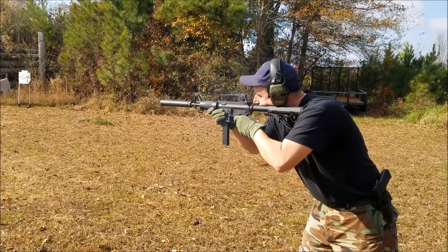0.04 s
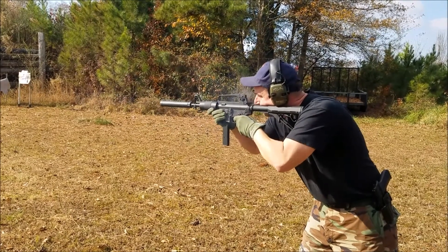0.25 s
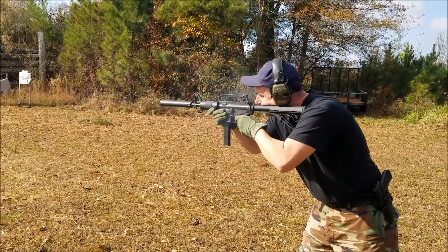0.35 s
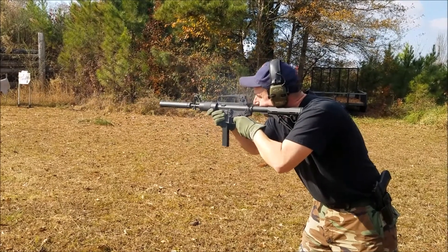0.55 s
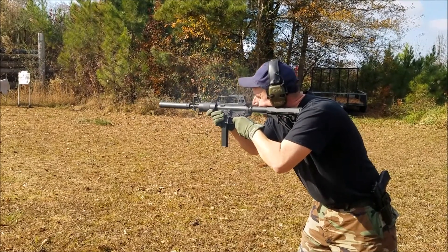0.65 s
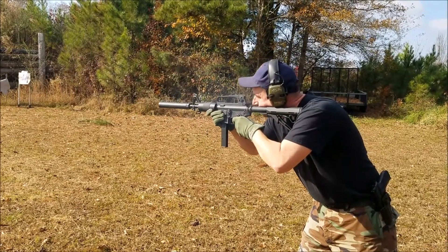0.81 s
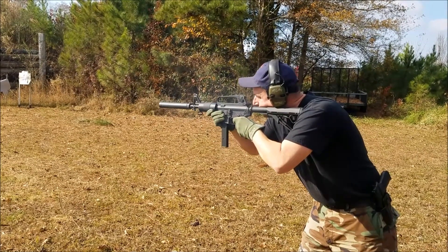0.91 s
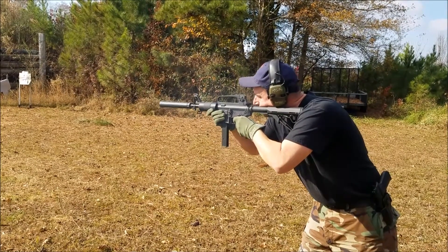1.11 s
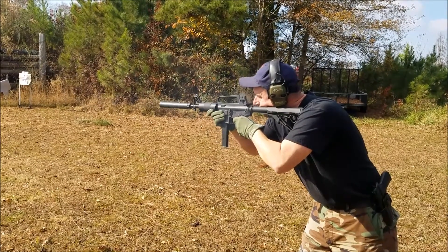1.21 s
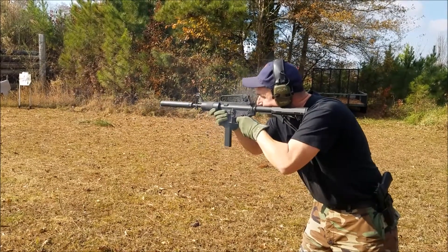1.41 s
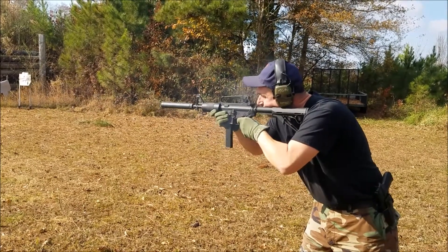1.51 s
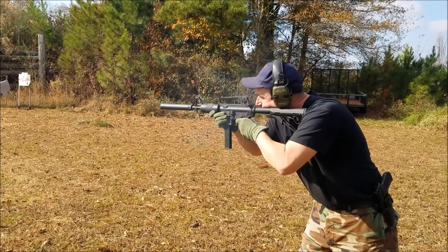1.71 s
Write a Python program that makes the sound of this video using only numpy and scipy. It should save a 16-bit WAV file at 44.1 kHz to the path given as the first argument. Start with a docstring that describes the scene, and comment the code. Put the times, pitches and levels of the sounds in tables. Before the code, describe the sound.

Muffled automatic gunfire in two short bursts, with clattering bolt and bullets clanging on a steel target

```python
"""First a steel plate hums over faint open-range air, an engine drone and a thin whine: drifting sines and noise.
Then a suppressed rifle fires two rounds and, a second later, three. Each is a dull pop of shaped noise with a
short ring from the can, and the bolt clatters as brief noise knocks. About a tenth of a second after the shots
begin, hits on the hanging plate splash, thud and ring as fading sines. Trees return a short tail of noisy echoes."""
import sys
import numpy as np
from scipy import signal
from scipy.fft import rfft, irfft
from scipy.io import wavfile
from scipy.ndimage import uniform_filter1d

SR = 44100
rng = np.random.default_rng(int(sys.argv[2]) if len(sys.argv) > 2 else 0)


def wav_out(sig):
    """Save sig, one row per channel (or a flat mono array), as 16-bit PCM at SR to the path in sys.argv[1]."""
    wavfile.write(sys.argv[1], SR, np.round(np.clip(np.atleast_2d(sig).T, -1, 1) * 32767).astype(np.int16))


N = 77175  # 1.75 seconds

# lowest hum of the swinging plate: [t/s, f/Hz, level/dB, how far the left lags/radians]
HUM = [(0, 1494, -31.5, 3.04), (.1, 1490, -22.5, 2.33), (.16, 1487, -26, 2.76), (.21, 1513, -27.5, 2.04),
       (.31, 1522, -51, 2.1), (.36, 1485, -15.5, 2.38), (.45, 1483, -26, 1.9), (.5, 1485.5, -23, 2.54),
       (.55, 1485.5, -32, 0.92), (.572, 1484, -38, 2.3), (.6, 1483, -24.5, 2.66), (.67, 1488, -17.5, 2.56),
       (.735, 1480, -24.5, 2.97), (.79, 1490, -19.5, 2.4), (.9, 1487, -21.5, 2.45),
       (1.04, 1494, -25.5, 2.52), (1.13, 1488, -17.5, 2.34), (1.2, 1498, -20.5, 2.51),
       (1.29, 1457, -38, 0.8), (1.34, 1495, -62, 2.4), (1.5, 1489, -76, 2.4), (1.62, 1488, -55, 1.84),
       (1.75, 1437, -54, 2.4)]
# colour of the air and leaves: [f/Hz, level per Hz/dB]
AIR_SPECTRUM = [(30, -17.5), (95, -12), (190, -10.5), (450, -1), (900, -8.5), (1800, -12), (3000, -14),
                (6000, -24.5), (9400, -35), (12000, -26), (14800, -21), (16500, -47)]
# background over time, before the layers are weighted: [t/s, air level/dB, drone level/dB]
BACKGROUND_LEVEL = [(0, -62.5, -58), (.19, -63.5, -48.5), (.24, -46.5, -54), (.45, -58.5, -59.5),
                    (.75, -64, -64), (1.03, -67, -66), (1.1, -64, -59), (1.23, -62, -52.5), (1.3, -50, -49),
                    (1.5, -57, -62.5), (1.75, -65, -70.5)]
# tones of the engine drone, relative to its level: [f/Hz, level/dB]
DRONE = [(94.5, -3), (285, -3.5), (475, -2)]
# thin high whine: [t/s, level/dB]
WHINE = [(0, -78), (.5, -59), (.66, -53.5), (.8, -67), (1.2, -68), (1.75, -89)]
# rounds fired: [t/s, gas level/dB, thump level before halving/dB, pop length/s]
ROUNDS = [(.2048, -4.5, -15, .012), (0.2705, -10, -17, 0.013), (1.2396, -4.5, -12.5, 0.013),
          (1.3045, -9, -19, 0.0094), (1.3723, -12.5, -21, 0.0084)]
# colour of the gas pop: [f/Hz, level per Hz/dB]
GAS_SPECTRUM = [(24, -50), (40, -32.5), (406, -5), (1170, -4), (2370, -7), (3050, -8), (3920, -15),
                (5440, -10), (8560, -28), (9240, -22.5), (11000, -13.5), (14900, -11), (16500, -41.5)]
# ringing of the suppressor can, relative to the thump: [f/Hz, level/dB, time to fade 60 dB/s]
CAN_MODES = [(315, -9.5, 0.066), (443, 12, 0.018), (950, -9.5, 0.006), (1269, 3, 0.03), (1290, 5.5, 0.054),
             (1860, -9, 0.012)]
# when the three puffs of gas leave the can, after the shot: [t/s]
CAN_PUFFS = [0, .0025, 0.007064]
# trigger, hammer, bolt and sling knocks, and one late bullet hit: [t/s, level/dB, decay/s, brightness/dB per
# octave]
KNOCKS = [(0.166, -51, 0.0077, 4.5), (.755, -59.5, 0.045, -2), (0.986, -47, 0.012, 6),
          (1.204, -43.5, .006, 4.5), (1.4866, -20.5, 0.0051, -3), (0.1951, -22.5, 0.0058, -2.5),
          (0.2215, -11, 0.0042, 1), (0.243, -21, 0.0027, -3), (.2604, -4, 0.002, 2.5),
          (0.288, -15.5, 0.015, 0.5), (.3100, -23, 0.023, .3), (.3255, -9, 0.0081, 9.5),
          (1.2304, -18, 0.004, -3), (1.2590, -16.5, 0.0032, -2), (1.2790, -35, .004, 11),
          (1.296, -6, 0.0013, 2), (1.323, -12, 0.0043, 8), (1.4253, -5.5, 0.001, -1.6),
          (1.64, -60, .002, -35)]
# colour of the rifle's action, before any tilt: [f/Hz, level per Hz/dB]
ACTION_SPECTRUM = [(60, -43), (250, -7.5), (1000, -6.5), (2100, 0), (4200, -4.5), (6500, -6), (9300, -15.5),
                   (11500, -8.5), (14500, -4.5), (16500, -33.5)]
# bands of the tree echo, relative to each other: [f/Hz, time to fade 60 dB/s, level/dB]
TREE_BANDS = [(100, .35, -3.5), (370, 0.72, -8), (1543, 0.49, 2.5), (4040, 0.59, 0.5), (8460, 0.52, 0),
              (15000, 0.38, 3)]
# strikes on the plate: [t/s, splash level/dB, splash decay/s, share of full ring length,
# then one ring level/dB for each frequency in STRIKE_HZ]
STRIKES = [(.3190, -11.5, 0.028, 0.86, -29.5, -20, -48, -23.5, -17.5, -16.5, -30.5, -12.5, -32.5, -40.5),
           (0.384, -6, 0.0054, 0.67, -38, -37.5, -25, -37, -20.5, -17, -29.5, -39.5, -29, -28.5),
           (1.3547, -12, 0.024, 0.67, -50, -21.5, -41.5, -38, -34, -25.5, -29, -21, -17, -19),
           (1.382, -23.5, 0.019, 0.27, -49, -49, -35, -23, -16, -38, -40, -10, -44, -42),
           (1.4260, -18, 0.011, .5, -35, -33, -48.5, -36, -65, -54, -58, -42, -40, -38)]
# frequencies at which each strike's ring level is given: [f/Hz]
STRIKE_HZ = [2069, 2484, 3225, 3927, 4901, 5790, 7600, 8036, 11200, 13400]
# pitches of the plate's modes: [f/Hz]
PLATE_HZ = [2069, 2484, 3225, 3927, 4901, 5767, 5815, 7517, 7742, 8036, 8305, 11057, 11490, 12570, 13360,
            14390]
# the same modes, added to or shortened by each strike: [level/dB, full time to fade 60 dB/s, swell/s]
PLATE_MODES = [(9, 0.26, 0.0038), (-2.5, 0.27, 0.012), (4, 0.29, 0.014), (-4.5, 0.36, .008),
               (4, .34, 0.013), (-3.3, .33, 0.017), (-2.5, 0.21, 0.004), (-2, 0.21, 0.0031),
               (-7.5, 0.332, 0.0092), (-1.6, .17, 0.0067), (-9, 0.24, 0.005), (-7, 0.29, .006),
               (4.5, 0.11, .004), (-13.5, 0.39, .006), (-5.5, .28, .01), (-9, .2, 0.0026)]
# dull thuds from the target bank: [t/s, level/dB, f/Hz, time to fade 60 dB/s]
THUDS = [(0.326, -20, 280, 0.028), (0.384, -22.5, 103.6, 0.039), (1.354, -15.5, 390, 0.02),
         (1.4915, -20, 262, 0.026)]

HUM_PAN_DB = -3  # left against right
AIR_FLICKER_DB, DRONE_WAVER_DB, WHINE_WAVER_DB, WHINE_HZ = 2, 3, 4.9, 11860
RIFLE_LEFT_LAG_S, RIFLE_PAN_DB = -0.000273, 4  # a negative lag reaches the left first
RIFLE_WIDE = 0.86  # share of noise power that each microphone has to itself
LEAD_IN_S = .002  # silence ahead of each burst
GAS_RISE_S, GAS_GRAIN_DB = 0.00092, 6
GAS_TAIL_DB, GAS_TAIL_S = -7.5, .022  # hiss against pop
KNOCK_RISE = .4  # part of the decay time
TREES_DB, TREES_RISE_S = -14.5, 0.028
PLATE_LEFT_LAG_S, PLATE_PAN_DB = 0.000284, 3.5
PLATE_WOBBLE_DB, PLATE_ROUGH_DB = 1.5, 2.5  # slow waver; fast waver at 12 kHz
PLATE_TURN = 1.5  # above 1, the fade speeds up
PLATE_AFTER_DB, PLATE_AFTER_S = -37, 4  # faint late ring; its 60 dB fade at 4 kHz for a full-length ring
PLATE_ECHO = 0.11  # gain of the ring into the trees
MIC_LOW_HZ, TOP_HZ, CLIP_DRIVE = 135, 16200, 1.27


def undb(db):
    """Turn decibels into gain."""
    return 10 ** (np.asarray(db, float) / 20)


def clock():
    """Time in seconds for every sample."""
    return np.arange(N) / SR


def curve(table, axis=1):
    """Join one column of a table over time, with rounded corners."""
    table = np.array(table, float)
    return uniform_filter1d(np.interp(clock(), table[:, 0], table[:, axis]), size=400)


def noise(table, size, tilt_db=0.):
    """Noise of rms 1, coloured by [f/Hz, level/dB] points and a tilt in dB per octave."""
    table = np.array(table, float)
    f = np.maximum(np.fft.rfftfreq(size, 1 / SR), 10)
    db = np.interp(np.log(f), np.log(table[:, 0]), table[:, 1]) + tilt_db * np.log2(f / 3000)
    x = irfft(rfft(rng.standard_normal(size)) * undb(db), size)
    return x / x.std()


def walk(rate, size):
    """Random levels, rate of them a second, joined by straight lines."""
    steps = rng.standard_normal(int(size / SR * rate) + 2)
    return np.interp(np.arange(size) / SR * rate, np.arange(len(steps)), steps)


def add(out, x, at):
    """Mix x into out, starting at a time in seconds."""
    i = int(at * SR)
    x = x[..., :N - i]
    out[..., i:i + x.shape[-1]] += x


def place(x, lag, pan_db):
    """Set a sound between two microphones: the left hears it lag seconds late and pan_db louder."""
    f = np.fft.rfftfreq(len(x), 1 / SR)
    left = irfft(rfft(x) * np.exp(-2j * np.pi * f * lag), len(x))
    return np.array([left, x]) * undb([[pan_db / 2], [-pan_db / 2]])


def burst(table, shape, tilt_db=0., grain_db=0.):
    """Grainy shaped noise, partly shared by both microphones and partly their own."""
    grainy = shape * undb(grain_db * walk(1000, size=len(shape)))
    shared, left, right = (noise(table, len(shape), tilt_db) * grainy for _ in range(3))
    x = np.sqrt(1 - RIFLE_WIDE) * place(shared, RIFLE_LEFT_LAG_S, RIFLE_PAN_DB)
    x += np.sqrt(RIFLE_WIDE) * np.array([left, right])
    return x * np.sqrt(2 * np.sum(shape ** 2) / np.sum(x ** 2))  # same energy as the smooth shape


def hum():
    """The plate's lowest mode outlasts the others; its pitch and level drift with the swing."""
    phase = 2 * np.pi * np.cumsum(curve(HUM, axis=1)) / SR
    left = undb(HUM_PAN_DB) * np.sin(phase - curve(HUM, axis=3))
    return np.sqrt(2) * undb(curve(HUM, axis=2)) * np.array([left, np.sin(phase)])


def field():
    """Noise makes air and leaves; wavering sines make a far engine drone and a thin whine."""
    t = clock()
    sides = np.array([noise(AIR_SPECTRUM, N) * undb(AIR_FLICKER_DB * walk(4, size=N)) for _ in range(2)])
    air = 0.71 * noise(AIR_SPECTRUM, N) + 2.11 * sides
    drone = sum(undb(db + DRONE_WAVER_DB * walk(9.1, size=N)) * np.sin(2 * np.pi * hz * t)
                for hz, db in DRONE)
    whine = undb(curve(WHINE) + WHINE_WAVER_DB * walk(25, size=N)) * np.sin(2 * np.pi * WHINE_HZ * t)
    background = undb(curve(BACKGROUND_LEVEL)) * air + undb(curve(BACKGROUND_LEVEL, axis=2)) * drone
    return background + place(whine, .00002, 1.5)


def rifle():
    """Gas spits grainily from the can and makes it ring; trigger, hammer, bolt and sling knock, and a late
    bullet hit clicks."""
    out, t = np.zeros((2, N)), clock()[:4096] - LEAD_IN_S
    for at, gas_db, thump_db, length in ROUNDS:
        on = np.clip(t / GAS_RISE_S, 0, 1)
        pop = burst(GAS_SPECTRUM, on / (1 + (t / length) ** 10), grain_db=GAS_GRAIN_DB)
        hiss = burst(ACTION_SPECTRUM, on * np.exp(-t / GAS_TAIL_S), 1.2, grain_db=3.5)
        add(out, undb(gas_db) * (pop + undb(GAS_TAIL_DB) * hiss), at - LEAD_IN_S)
        for puff in CAN_PUFFS:
            ring = np.zeros(len(t))
            for hz, db, t60 in CAN_MODES:
                puff_hz = hz * (1 + 0.017 * rng.standard_normal())  # pitch differs a little each time
                ring += undb(db) * np.sin(2 * np.pi * puff_hz * t) * 1000 ** (-t / t60)
            thump = place(on * ring, RIFLE_LEFT_LAG_S, RIFLE_PAN_DB)
            add(out, undb(thump_db) / 2 * thump, at + puff - LEAD_IN_S)
    for at, db, decay, tilt_db in KNOCKS:
        shape = np.clip(t / (KNOCK_RISE * decay), 0, 1) * np.exp(-t / decay)
        add(out, undb(db) * burst(ACTION_SPECTRUM, shape, tilt_db, grain_db=3.0), at - LEAD_IN_S)
    return out


def trees(x):
    """Trees scatter echoes: each channel is smeared by noise bands that fade at their own rates."""
    t, out = clock()[:SR], []
    for ear in x:
        echo = np.zeros(len(t))
        for hz, t60, db in TREE_BANDS:
            band = noise([(hz / 4, -30), (hz, 0), (hz * 4, -36)], SR)
            echo += band * np.sqrt(hz) * undb(db) * 1000 ** (-t / t60)
        echo *= 1 - np.exp(-t / TREES_RISE_S)
        out.append(signal.fftconvolve(ear, echo / np.sqrt(np.sum(echo ** 2)))[:N])
    return undb(TREES_DB) * np.array(out)


def plate():
    """Lead splashes on steel and thuds; each mode swells, then fades ever faster as the plate turns away."""
    out, ring, turns = np.zeros((2, N)), np.zeros(N), rng.random(len(PLATE_MODES))
    for at, db, decay, share, *ring_db in STRIKES:
        start = int(at * SR)
        t = clock()[:N - start]
        splash = np.clip((t - LEAD_IN_S) / 0.00072, 0, 1) * np.exp(-t / decay)
        add(out, undb(db) * burst(ACTION_SPECTRUM, splash[:8192], -1.7, grain_db=1.5), at - LEAD_IN_S)
        for hz, turn, (mode_db, t60, swell) in zip(PLATE_HZ, turns, PLATE_MODES):
            wobble_db = PLATE_WOBBLE_DB * walk(30, size=N)
            rough_db = PLATE_ROUGH_DB * (hz / 12000) ** 2 * walk(250, size=N)
            level_db = mode_db + np.interp(hz, STRIKE_HZ, ring_db) + (wobble_db + rough_db)[:len(t)]
            fade = 1000 ** -(t / (t60 * share)) ** PLATE_TURN
            fade += undb(PLATE_AFTER_DB) * 1000 ** (-t * hz / 4000 / (PLATE_AFTER_S * share))
            # every strike keeps a mode on one running phase
            tone = np.sin(2 * np.pi * (hz * (t + start / SR) + turn))
            add(ring, undb(level_db) * (1 - np.exp(-t / swell)) * fade * tone, at)
    for at, db, hz, t60 in THUDS:
        t = clock()[:N - int(at * SR)]
        thud = np.sin(-2 * np.pi * hz * t) * 1000 ** (-t / t60)
        add(out, undb(db) * thud * np.ones((2, 1)), at)
    return out, place(ring, PLATE_LEFT_LAG_S, PLATE_PAN_DB)


def scene():
    """Hum and field lie under the rifle and plate hits, thinned in the bass, with ring and echoes."""
    hits, ring = plate()
    low_cut = signal.butter(2, MIC_LOW_HZ, "high", fs=SR, output="sos")
    near = signal.sosfilt(low_cut, rifle() + hits)
    return hum() + field() + near + ring + trees(near + PLATE_ECHO * ring)


def record(dry):
    """The camera rounds the loudest peaks and cuts the top."""
    rounded = np.tanh(CLIP_DRIVE * dry) / CLIP_DRIVE
    return signal.sosfilt(signal.ellip(8, .2, 70, TOP_HZ, fs=SR, output="sos"), rounded)


dry = scene()
out = record(dry)
wav_out(out)
```